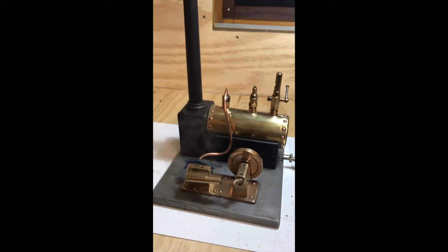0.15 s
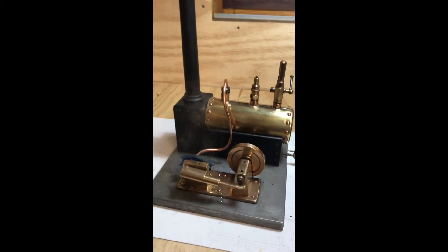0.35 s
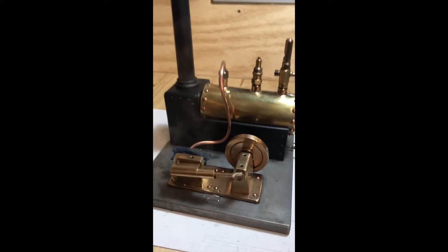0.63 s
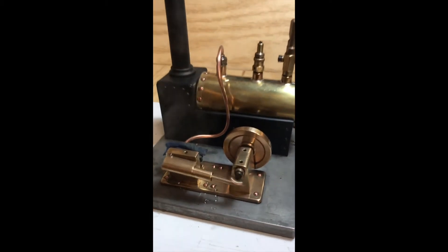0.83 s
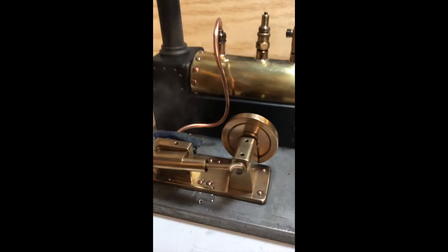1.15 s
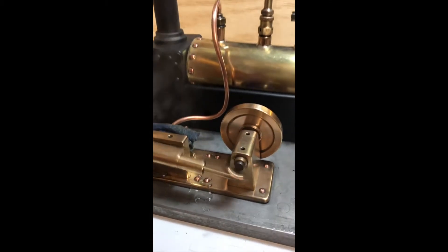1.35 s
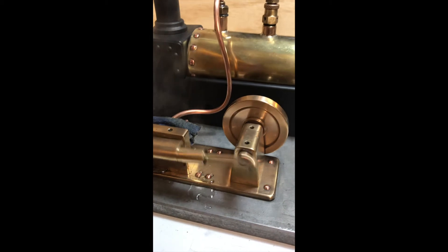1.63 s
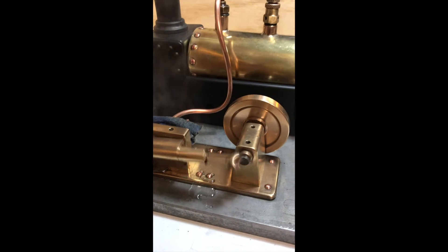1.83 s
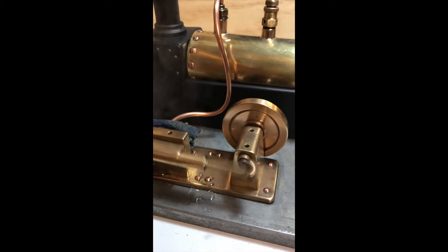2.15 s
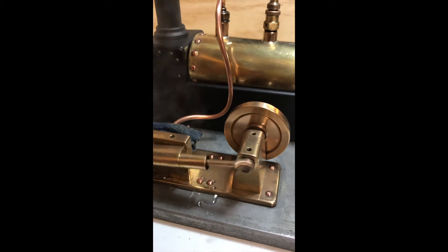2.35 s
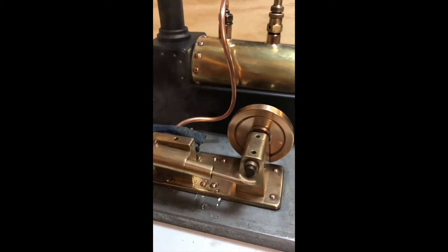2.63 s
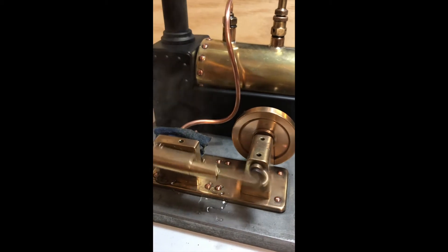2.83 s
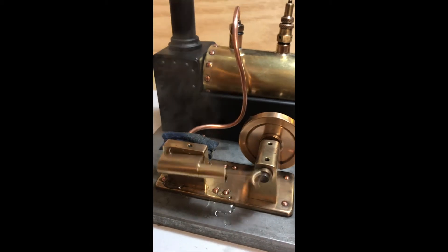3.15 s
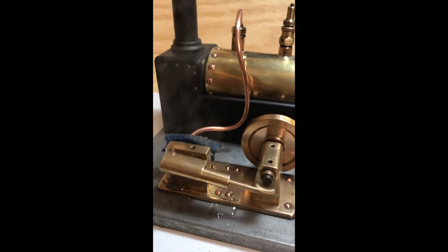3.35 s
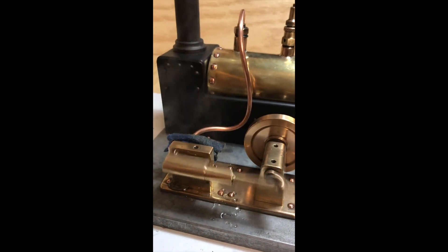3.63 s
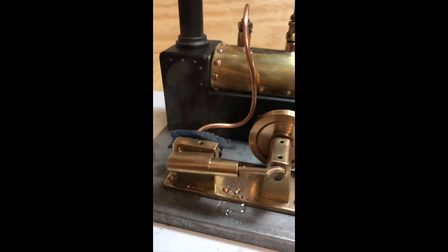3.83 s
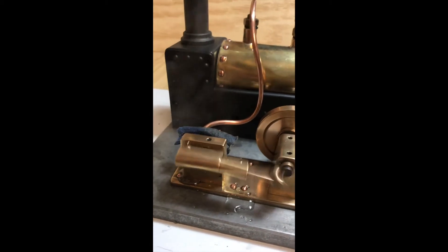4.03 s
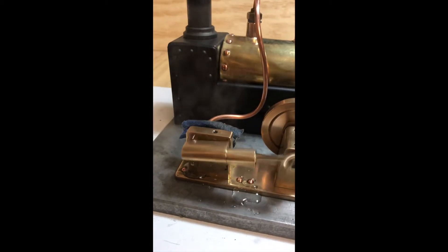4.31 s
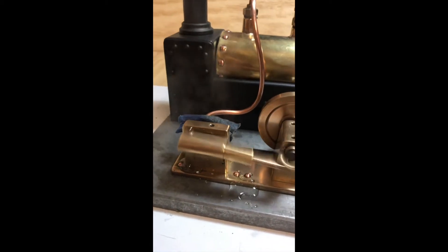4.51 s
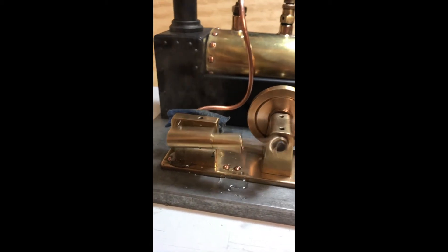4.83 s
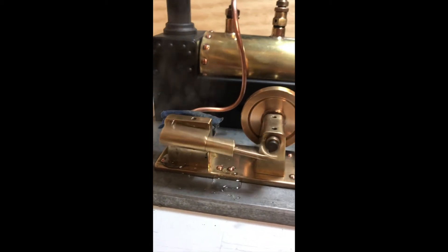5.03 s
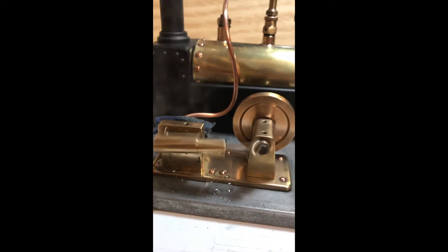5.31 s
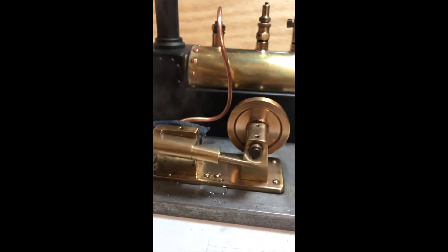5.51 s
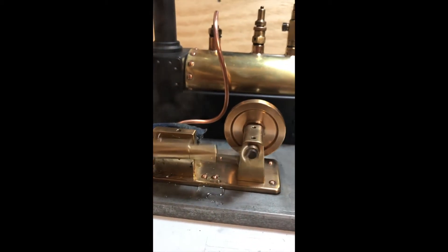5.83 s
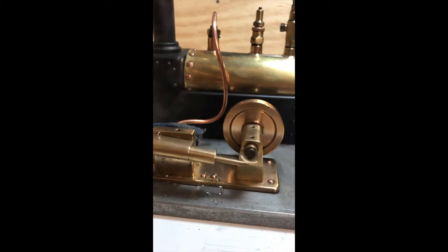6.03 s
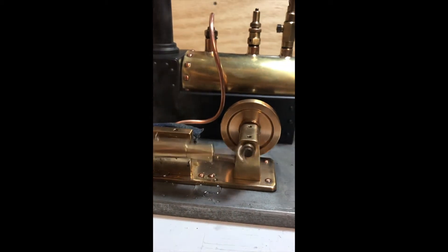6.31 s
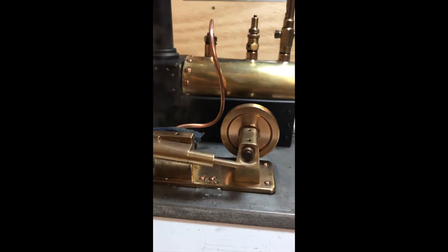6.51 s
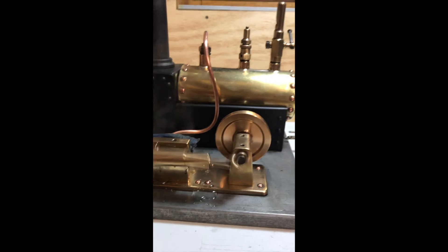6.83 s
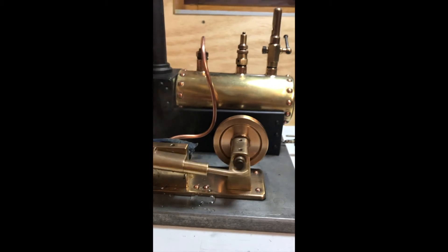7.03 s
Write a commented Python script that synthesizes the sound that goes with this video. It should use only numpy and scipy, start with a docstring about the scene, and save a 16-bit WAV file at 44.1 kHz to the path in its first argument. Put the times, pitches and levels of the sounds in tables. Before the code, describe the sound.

A small brass steam engine runs on a bench in a small room, the phone microphone close and moving round it. From 0 s to the end at about 7 s, the slack linkage clatters 13 to 14 times a second, quickening very slightly: a bright, gritty metallic chatter of a few milliseconds on each out-stroke, a softer one on the return, with thin brass ringing and small dull thuds through the bench. Faint steady steam hiss and a wavering low hum lie far beneath. The clatter is a little softer at first, fuller from about 1 s. The base plate knocks at 0.4 s, several times from 2.7 to 3 s, the heaviest clatter, and again around 6 s. Tiny wet rising chirps spit at 0.7 s and about 2 s, then more often from 5.1 to 6 s, with stragglers near 6.5 and 7 s. From 4 s the tone shifts subtly as the microphone moves. The engine never stops.

```python
"""A small brass steam engine on a bench in a small room, close to a phone microphone that moves round it.
From the start, 13 to 14 times a second, slack in the linkage closes with a short chatter of metal, loud on
the out-stroke and softer on the return: noise taps ring brass and plate modes, pushes sound bench modes.
Steam hiss and a low hum run throughout as shaped noise; the room answers the metal with a brief noise tail.
The base plate knocks at about 0.4, 2.7 to 3 and 6 s; wet chirps, short rising tones, come from 0.7 s on."""
import sys
import numpy as np
from scipy import signal
from scipy.io import wavfile
from scipy.ndimage import uniform_filter1d

SR = 44100
rng = np.random.default_rng(int(sys.argv[2]) if len(sys.argv) > 2 else 0)


def dump(signal):
    """Clip the signal to [-1, 1] and save it as 16-bit WAV at the path in sys.argv[1]."""
    limited = np.clip(np.atleast_2d(signal).T, -1, 1)
    pcm = np.round(limited * 32767).astype(np.int16)
    wavfile.write(sys.argv[1], SR, pcm)


N = 316197  # samples


def amp(db):
    """Decibels to gain."""
    return 10 ** (np.asarray(db) / 20)


def unit(x):
    """Scales to rms 1."""
    return x / np.sqrt(np.mean(x ** 2) + 1e-20)


def read(f, value, hz):
    """Reads a spectrum on a log-frequency axis."""
    return np.interp(np.log(hz + 1), np.log(np.asarray(f) + 1), value)


def add(mix, s, sound):
    """Mixes a sound in at time s."""
    part = mix[..., max(round(s * SR), 0):][..., :sound.shape[-1]]
    part += sound[..., :part.shape[-1]]


# The microphone's path round the engine.
# Each row: time in seconds, share of the way from its first place to its second (0-1).
MIC_PATH = [(0, 0.58), (1, 0.061), (2, 0.079), (3, 0.22), (3.8, 0.61), (4.5, 0.76), (5.5, 1), (6.3, 1),
            (7.17, 1)]


def mic_travel(s):
    """How far the microphone has moved from its first place to its second, 0-1."""
    return np.clip(np.interp(s, *np.transpose(MIC_PATH)), 0, 1)


# Steam, burner and room air: the shape of the hiss at the first place.
# Each row: frequency in Hz, relative density in dB per Hz.
HISS_SPECTRUM = [(30, 5), (60, 6.5), (100, 6), (200, -6), (500, -7), (1200, -4.5), (2100, -14), (4300, -11),
                 (5300, -14), (7100, -8), (8700, -10), (10500, -12), (12000, -19), (16000, -5)]
# What the second place adds to it. Each row: frequency in Hz, change in dB.
HISS_CHANGE = [(100, -11), (300, 4.5), (1000, -3), (2500, 2.5), (5000, -2.5), (9000, 2.5), (15000, -11)]
HISS_DB = -50  # rms over the whole scene, both places together


def hiss():
    """Noise coloured by steam, burner and room air, with patches drifting over time and frequency."""
    hz = np.fft.rfftfreq(2048, 1 / SR)
    real, imaginary, patches = rng.standard_normal((N // 512 + 5, 1025, 3)).T
    patches = uniform_filter1d(patches, 20, 0)  # smooth across frequency
    patches = unit(uniform_filter1d(patches, 8, 1))  # and across time
    colour_db = read(*np.transpose(HISS_SPECTRUM), hz)[:, None]
    z = (real + 1j * imaginary) * amp(colour_db + 0.71 * patches)
    travel = mic_travel(np.arange(z.shape[1]) * 512 / SR)
    z *= amp(read(*np.transpose(HISS_CHANGE), hz)[:, None] * travel)
    return amp(HISS_DB) * unit(signal.istft(z, nperseg=2048, noverlap=1536)[1][:N])


# A wavering low hum. Each row: centre in Hz, width in Hz, rms level in dB.
HUM_BANDS = [(56, 6, -56.5), (85, 9, -61)]


def hum():
    """Noise through narrow low bands, which makes the tone waver."""
    out = np.zeros(N)
    for centre, width, db in HUM_BANDS:
        band = signal.butter(1, [centre - width / 2, centre + width / 2], "bandpass", fs=SR)
        noise = signal.lfilter(*band, rng.standard_normal(2 * N))
        out += amp(db) * unit(noise[N:])  # the first half lets the filter settle
    return out


# The small room. Each row: frequency in Hz, relative level of the near walls in dB, their t60 in seconds,
# relative level of the diffuse tail in dB, its t60 in seconds.
ROOM_BANDS = [(576, -8.5, 0.033, -4, 0.076), (1930, -10.5, 0.028, -4, 0.14), (3740, -7.5, 0.012, -7.5, 0.1),
              (6600, -16, 0.024, -12.5, 0.12), (8500, -15, 0.056, -17, 0.079),
              (11900, -9, 0.011, -9.5, 0.11), (16000, -7, 0.016, -8, 0.12)]


def room(x):
    """Diffuse echo: the power in each band lingers and dies away, its fine structure left to chance."""
    hz, _, z = signal.stft(x, SR, nperseg=128, noverlap=96)
    f, *columns = np.transpose(ROOM_BANDS)
    power, lag = np.zeros(z.shape), np.arange(400) * 32 / SR
    for db, t60 in (columns[:2], columns[2:]):
        decay = amp(-120 * lag / read(f, t60, hz)[:, None])  # of power, so 60 dB in t60
        decay *= lag > .002
        decay *= amp(2 * read(f, db, hz))[:, None] / decay.sum(1, keepdims=True)
        power += signal.fftconvolve(abs(z) ** 2, decay, axes=1)[:, :z.shape[1]]
    real, imaginary = rng.standard_normal((z.shape[1], len(hz), 2)).T
    echo = np.sqrt(abs(power) * 2) * (real + 1j * imaginary)
    return signal.istft(echo, nperseg=128, noverlap=96)[1][:N]


def flywheel(turn):
    """Time at which the steady flywheel reaches a turn count: a smooth curve through the out-strokes."""
    starts = [row[0] for row in TURNS]
    return np.polynomial.Polynomial.fit(np.arange(len(TURNS)), starts, 9)(turn)


# The bench under the engine. Each row: mode in Hz, t60 in seconds, level after the out-stroke in dB,
# level after the return in dB, change at the microphone's second place in dB.
BENCH_MODES = [(81, 0.089, -41.5, -72, 0.5), (106, 0.075, -56.5, -53.5, 5.5), (139.7, 0.12, -52.5, -53, -1),
               (183.7, 0.2, -73.5, -54, 5.5), (226.4, 0.1, -75, -53, 2), (294.7, 0.32, -76, -60.5, 6.5),
               (318.6, 0.14, -68, -51, -4.5), (394.5, 0.13, -74, -51.5, -3), (437, 0.14, -73, -46, -6),
               (540.3, 0.12, -75, -52, 3), (596, 0.042, -76, -58, 4), (677, 0.075, -59, -48.5, -3),
               (730, 0.12, -56, -61, 3), (804, 0.21, -60.5, -52.5, -1.5), (893, 0.064, -67, -43.5, -11),
               (970, 0.077, -63, -47.5, -8)]
OUT_THUD, BACK_THUD = .05, .465  # share of a turn at which each push reaches the bench


def bench():
    """The piston pushes the bench at both ends of its travel, in step with the steady flywheel."""
    t, pushes, out = np.arange(SR // 3) / SR, np.zeros((2, N)), np.zeros(N)
    for turn in range(len(TURNS)):
        out_push = amp(1.8 * rng.standard_normal(1))
        add(pushes[0], flywheel(turn + OUT_THUD), out_push)
        back_s = flywheel(turn + BACK_THUD) + 0.00015 * rng.standard_normal()
        add(pushes[1], back_s, amp(0.26 * rng.standard_normal(1)))
    travel = mic_travel(np.arange(N) / SR)
    for hz, t60, out_db, back_db, change_db in BENCH_MODES:
        push = amp([out_db, back_db]) @ pushes * amp(travel * change_db)
        mode = np.sin(2 * np.pi * hz * t) * amp(-60 * t / t60)
        mode *= np.minimum(t / 0.00087, 1)  # soft onset
        out += signal.oaconvolve(push, mode)[:N]
    return out


# Brief wet chirps. Each row: start in seconds, peak level in dB, nominal pitch in Hz, length in ms.
CHIRP_EVENTS = [(.743, -46, 2350, 7.4), (1.971, -37, 3930, 5.1), (2.170, -41, 2630, 6.5),
                (5.104, -47, 1950, 6), (5.234, -36, 4400, 8), (5.296, -35, 4400, 7.1),
                (5.317, -43, 4440, 8.8), (5.451, -34, 4120, 9.4), (5.681, -39, 2660, 7),
                (5.752, -41, 4590, 7.8), (5.966, -41, 4170, 8.6), (6.461, -40, 2600, 7.8),
                (6.956, -43, 4380, 9.9)]


def chirps():
    """Short rising tones, like water spitting at a joint."""
    out = np.zeros(N)
    for s, db, hz, ms in CHIRP_EVENTS:
        t = np.arange(round(ms * SR / 1000)) / SR
        tone = np.sin(2 * np.pi * hz * t * (.98 + 4. * t))  # pitch rises from 0.98 of nominal
        add(out, s, amp(db) * np.hanning(len(t)) * tone)
    return out


# Thin brass parts that keep ringing. Each row: pitch in Hz, t60 in seconds, level for the loudest stroke
# in dB at the first place and at the second, before the luck of each stroke.
THIN_PARTS = [(1240, .07, -47, -50), (2850, .06, -55, -51), (4480, .05, -54, -49), (5500, .05, -53, -52),
              (7250, .07, -46, -46), (7800, .06, -51, -48), (8420, .08, -44, -47), (9080, .06, -48, -45),
              (11050, .06, -50, -47), (12300, .06, -51, -49)]


def ringing(blows):
    """Every stroke strikes each thin part with its own strength."""
    t, out = np.arange(SR // 8) / SR, np.zeros(N)
    stroke_s, upper_db = blows[:, 0], blows[:, 5]
    at, travel = (stroke_s * SR).astype(int), mic_travel(stroke_s)
    luck = rng.standard_normal((len(at), len(THIN_PARTS)))
    for (hz, t60, first_db, second_db), share in zip(THIN_PARTS, luck.T):
        place_db = first_db + travel * (second_db - first_db)
        strikes = np.zeros(N)
        strikes[at] = share * amp(upper_db - upper_db.max() + place_db)
        tone = np.sin(2 * np.pi * hz * t) * amp(-60 * t / t60)
        tone *= np.minimum(t / 0.00065, 1)  # soft onset
        out += signal.oaconvolve(strikes, tone)[:N]
    return out


# The engine's turns, one row each. Each row: out-stroke in seconds, levels of its low, middle and upper
# brass modes in dB, level of the base plate in dB, level of the return stroke's upper modes in dB.
TURNS = [(0.0044, -30.5, -27, -26, -46, -39), (0.0815, -28.5, -23.5, -26, -43.5, -37),
         (0.1588, -30, -27.5, -22, -47, -38), (0.2359, -26.5, -22.5, -25, -46, -38),
         (0.313, -29, -23.0, -26, -46, -40), (0.3902, -32, -27, -23.5, -43, -29.0),
         (0.4668, -30, -24, -22.5, -44.5, -31.0), (0.544, -28.5, -24, -24, -45.5, -33.5),
         (0.6214, -31, -22, -26, -47.5, -35), (0.6971, -31, -24.5, -23.5, -45, -34),
         (0.7744, -32, -25.0, -23, -42.5, -35), (0.8503, -32.5, -21.5, -23.0, -41.5, -35),
         (0.9269, -30.5, -22, -23, -40, -37), (1.0024, -31.5, -22, -24.5, -40.5, -35),
         (1.079, -25, -16.5, -22, -42.0, -34), (1.1539, -32.5, -23.0, -22, -39.5, -31),
         (1.2302, -29.0, -22, -27, -44.5, -32), (1.3065, -29, -19.5, -24, -48.0, -31),
         (1.3817, -25, -18, -18, -40, -32), (1.4558, -29, -20.5, -21.5, -38, -29),
         (1.5318, -29, -19.5, -20.5, -35, -26.5), (1.6072, -30, -23.5, -20.5, -41.5, -24),
         (1.6824, -28.0, -19, -19, -36, -36), (1.7573, -29, -22, -21.5, -41, -32),
         (1.8324, -26.5, -19, -23, -41, -29.5), (1.9075, -27.5, -22, -24, -40, -35),
         (1.9814, -30, -21, -23.5, -40, -33.5), (2.056, -28.5, -20.5, -22.0, -40.0, -30.5),
         (2.1302, -30, -20, -22, -43, -34.5), (2.2048, -29.5, -23.0, -24, -39, -27),
         (2.2787, -27.5, -18, -18, -41.5, -32), (2.3537, -30.5, -21.5, -21, -42, -27.5),
         (2.428, -26, -19, -17.5, -42.0, -26.5), (2.5013, -29.5, -24.0, -23.5, -43, -25.5),
         (2.5753, -29, -25, -24, -45, -32), (2.6493, -28, -18, -22, -36.5, -22.5),
         (2.7239, -21, -18.5, -19.0, -32, -20), (2.7965, -27, -20.5, -20, -39, -20),
         (2.8703, -25, -19.0, -23, -36.5, -26.5), (2.9443, -24, -18.0, -25.0, -36, -34),
         (3.017, -30, -21, -19, -35, -30.0), (3.0909, -24.5, -20, -19.0, -40, -25),
         (3.1646, -28.5, -23, -16, -41, -33), (3.2368, -28.5, -15.5, -20, -43, -31.0),
         (3.3108, -30.5, -20, -22.0, -43.5, -32.5), (3.3838, -30.5, -18.5, -22.5, -44, -26),
         (3.4564, -28, -23, -18, -42.0, -30.5), (3.5288, -31.5, -23.5, -20.5, -43, -24),
         (3.6024, -25.5, -22.5, -17.5, -48, -31), (3.6751, -26, -20, -20, -36, -32),
         (3.7478, -27, -18, -22, -42.0, -31), (3.8206, -25, -21.5, -20.5, -42, -25.5),
         (3.8922, -27, -22.5, -19, -39.5, -33), (3.9652, -27.5, -24.0, -22.5, -41.5, -33),
         (4.0378, -25.5, -27.0, -18.5, -33.5, -27.5), (4.1101, -24, -24.0, -17.5, -38, -24.0),
         (4.182, -25.5, -21.0, -22, -42.5, -31.5), (4.2542, -28.5, -20.5, -19.5, -44, -26),
         (4.3262, -27, -25, -20, -38.5, -28.0), (4.3987, -29.5, -18.5, -19, -43, -30),
         (4.47, -25, -20.5, -19, -42, -28.5), (4.5426, -28, -20.5, -15.5, -46.0, -32),
         (4.6141, -29.0, -27, -24, -40, -27), (4.686, -31, -22.5, -16.5, -42.0, -30),
         (4.7584, -29, -27.5, -21, -37.5, -28), (4.83, -30, -24.5, -19, -37.5, -30),
         (4.9017, -24, -23, -22, -37.5, -34), (4.9728, -27, -22.0, -22.5, -41.5, -21),
         (5.045, -27, -23, -21, -40.5, -34), (5.117, -30.5, -22, -18.5, -44, -29.5),
         (5.1886, -26.5, -26, -17, -39.5, -30.5), (5.2597, -29.5, -30, -21, -39.5, -28),
         (5.3324, -22.5, -25, -19.0, -37.5, -35), (5.4038, -26, -27, -24.5, -41.5, -32),
         (5.475, -26, -25, -18.5, -42, -29.5), (5.5475, -27, -22.5, -20.5, -39, -32),
         (5.6191, -26, -24.5, -18, -41, -34.5), (5.6913, -27, -25, -20, -41.5, -30.5),
         (5.7626, -26.5, -26.0, -18.5, -40, -33), (5.835, -28.5, -26, -19, -43, -31.0),
         (5.907, -24.0, -27, -21.5, -35, -24.5), (5.978, -31, -27.5, -26, -39.0, -35),
         (6.0502, -22.5, -24, -18, -41, -24), (6.1215, -23.0, -26, -22.5, -40.5, -29),
         (6.194, -25, -23.5, -19, -37, -29.5), (6.2656, -27, -28.0, -18, -44, -33),
         (6.337, -25.5, -23, -19.5, -42, -27), (6.4091, -31, -30.5, -25.5, -43, -31),
         (6.4812, -25.5, -23.5, -22, -37, -30.5), (6.5524, -29, -29.5, -25, -41, -34),
         (6.6241, -27, -28, -17.5, -43, -35), (6.6961, -27.5, -25, -21.5, -43.5, -29),
         (6.7673, -23.5, -22, -22.5, -41.5, -33.0), (6.8392, -27.5, -24.5, -19.5, -42, -35.5),
         (6.9101, -25.5, -26.5, -20.5, -46, -34), (6.982, -26.5, -29, -23.5, -44, -31),
         (7.0542, -23, -26, -17.5, -45, -22.5), (7.1262, -25.5, -28, -19.5, -44.5, -29)]
# Low, middle and high modes of the return stroke, a row for each group.
# Each row: relative level in dB at the first place, relative level in dB at the second.
RETURN_MIX = [(-13.5, -9.5), (-2.5, -6.5), (-6, -4)]
RETURN_AT, RETURN_JITTER_MS = .403, .35  # share of a turn after the out-stroke; spread
# typical times, before each blow's own spread and haste
OUT_RISE_MS, OUT_FALL_MS, BACK_RISE_MS, BACK_FALL_MS = 1.8, 2.5, 2.0, 1.3
SHAPE_SPREAD_DB = 2.5  # how much rise and fall vary from blow to blow
OUT_USUAL_DB, SHORTER_PER_DB = -22.5, 0.06  # a harder blow is over sooner
BACK_USUAL_DB, BACK_FOLLOW = -29, 0.53  # a harder return is mostly louder in the upper modes
OUT_HIGH_DB = -3  # high modes against the mean of the middle and upper ones
MIX_SPREAD_DB, BACK_PLATE_DB = 0.5, -50.5


def strokes():
    """Rows (s, rise ms, fall ms, low, middle, upper, high and plate dB), two for each turn."""
    s, low, middle, upper, plate, back = np.transpose(TURNS)
    luck = rng.standard_normal((len(s), 8)).T
    high = (middle + upper) / 2 + OUT_HIGH_DB + MIX_SPREAD_DB * luck[3]
    rise, fall, back_rise = amp(SHAPE_SPREAD_DB * luck[4:7])
    out_haste = np.exp(-SHORTER_PER_DB * (upper - OUT_USUAL_DB))
    back_haste = np.exp(-SHORTER_PER_DB * (back - BACK_USUAL_DB))
    first, second = np.transpose(RETURN_MIX)[..., None]
    mix_db = first + mic_travel(s) * (second - first) + MIX_SPREAD_DB * luck[:3]
    follow_db = BACK_USUAL_DB + BACK_FOLLOW * (back - BACK_USUAL_DB)
    back_low, back_middle, back_high = follow_db + mix_db
    back_s = flywheel(np.arange(len(s)) + RETURN_AT) + RETURN_JITTER_MS / 1000 * luck[7]
    back_plate = np.full(len(s), BACK_PLATE_DB)
    out_rows = [s, OUT_RISE_MS * rise, OUT_FALL_MS * fall * out_haste, low, middle, upper, high, plate]
    back_rows = [back_s, BACK_RISE_MS * back_rise * back_haste, BACK_FALL_MS * back_haste,
                 back_low, back_middle, back, back_high, back_plate]
    return np.hstack([out_rows, back_rows]).T


LEAD_MS = 1.5  # faint rattle before the slack closes
BLOW_GAIN = np.sqrt(.004 * SR)  # every blow has the energy of 4 ms at full scale before its level


def chatter(rise_ms, fall_ms, taps_per_ms, spread_db, lead_db=-60):
    """Tiny impacts of uneven size that creep in, swell and die."""
    ms = np.arange(500) / SR * 1000 - LEAD_MS
    chance, size, sign = rng.random((3, 500))
    swell = (np.maximum(ms, 0) / rise_ms) ** 0.49
    shape = np.where(ms < rise_ms, swell, np.exp(-1.1 * (ms - rise_ms) / fall_ms))
    shape += amp(lead_db) * (ms / LEAD_MS + 1) * (ms < rise_ms)  # the rattle creeping in
    taps = (chance < taps_per_ms * 1000 / SR) * amp(-spread_db * np.log(size + 0.012))
    taps = taps * np.sign(sign - .5) * shape
    return taps * BLOW_GAIN / np.linalg.norm(taps + 1e-9)


def ring(modes, index):
    """Impulse response of damped modes, neighbours in opposite sign, energy 1."""
    t, h = np.arange(1024) / SR, 0
    for k, (hz, width, *db) in enumerate(modes):
        envelope = width ** 2 * t * np.exp(-np.pi * 1.5 * width * t)
        h = h + (-1) ** k * amp(db[index]) * envelope * np.sin(2 * np.pi * hz * t)
    return h / np.linalg.norm(h)


# Modes of the brass linkage in four groups, then of the base plate and of its knock. Each row: mode in Hz,
# nominal width in Hz, relative level in dB at the first place, relative level in dB at the second.
BRASS_LOW = [(2468, 290, -5, -9), (2763, 163, -3.5, -6.5), (3290, 525, -0.5, -5), (4265, 563, 1.5, 5),
             (5500, 1290, -5.5, 1.5)]
BRASS_MIDDLE = [(5916, 510, -2.5, 1), (6724, 1130, -5, 1), (7350, 883, 1, 4.5)]
BRASS_UPPER = [(8300, 510, 1, 2), (8936, 430, 4.5, 1.5), (9825, 950, -1, -5)]
BRASS_HIGH = [(10825, 790, -10, 4), (12150, 1170, 1, -3.5), (12960, 1100, 3, -17), (13780, 1100, -4.5, -3),
              (15400, 1200, -8, -10)]
PLATE_MODES = [(730, 380, -8.5, -2), (1233, 151, -1, 4.5), (1733, 320, -8.5, -3)]
KNOCK_MODES = [(594, 590, -13, -7), (1170, 490, 2, 7.5)]
# The base plate rocks and knocks.
# Each row: time in seconds, knock level in dB, rattle of the brass in dB before each group's share.
PLATE_KNOCKS = [(.4052, -35.5, -57), (.4118, -34, -36), (.4175, -55, -60), (2.656, -57, -29),
                (2.730, -30, -22), (2.7375, -29.5, -23), (2.7477, -35, -38), (2.8775, -35.5, -29),
                (3.022, -48, -41), (5.9136, -31.5, -28), (5.917, -33, -26), (5.92, -55, -39),
                (6.058, -36, -45), (6.064, -41, -43)]


def linkage(blows):
    """Each stroke drives the mode groups of the brass and the plate by its own amounts."""
    drive = np.zeros((6, N + SR))  # one second of run-up
    lead = 1 - LEAD_MS / 1000
    for s, rise, fall, *brass_db, plate_db in blows:
        taps = chatter(max(rise, .3) + .5, max(fall, .3), taps_per_ms=10.0, spread_db=3.5, lead_db=-12.5)
        add(drive[:4], s + lead - .0006, taps * amp(brass_db)[:, None])
        plate_taps = chatter(0.92, 5.1, taps_per_ms=1.8, spread_db=3.0)
        add(drive[4], s + lead + 0.00036, amp(plate_db) * plate_taps)
    for s, db, rattle_db in PLATE_KNOCKS:
        add(drive[5], s + 1, amp(db) * np.array([BLOW_GAIN]))
        shares = amp(rattle_db + np.array([[-4], [-5], [-5], [-7]]))
        add(drive[:4], s + lead, shares * chatter(0.31, 0.63, taps_per_ms=56.0, spread_db=7.0))
    travel, out = mic_travel(np.arange(N) / SR), np.zeros(N)
    groups = (BRASS_LOW, BRASS_MIDDLE, BRASS_UPPER, BRASS_HIGH, PLATE_MODES, KNOCK_MODES)
    for force, modes in zip(drive[:, SR:], groups):
        out += signal.oaconvolve(force * (1 - travel), ring(modes, index=0))[:N]
        out += signal.oaconvolve(force * travel, ring(modes, index=1))[:N]
    return out


def scene():
    """Linkage and chirps fill the room; ringing parts, bench, hiss and hum reach the microphone directly."""
    blows = strokes()
    metal = linkage(blows) + chirps()
    return (hiss() + hum() + room(metal) + bench() + ringing(blows) + metal)[None]


def record(dry):
    """The microphone loses the deepest bass below 46 Hz; then the band ends at about 15.85 kHz."""
    cut = signal.sosfilt(signal.butter(5, 46, "highpass", fs=SR, output="sos"), dry)
    band_limit = signal.firwin(301, 15850, window=("kaiser", 9), fs=SR)
    return signal.oaconvolve(cut, band_limit[None], "same")


dry = scene()
out = record(dry)
dump(out)
```